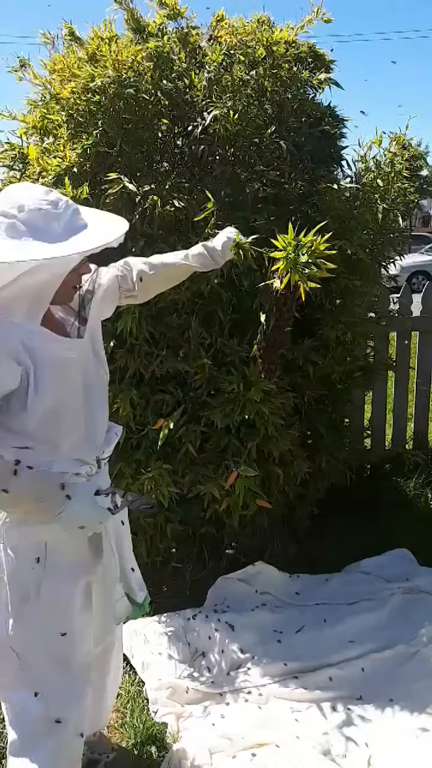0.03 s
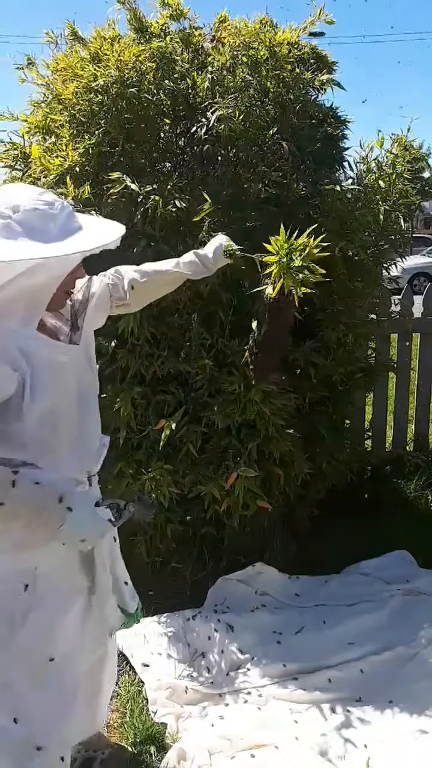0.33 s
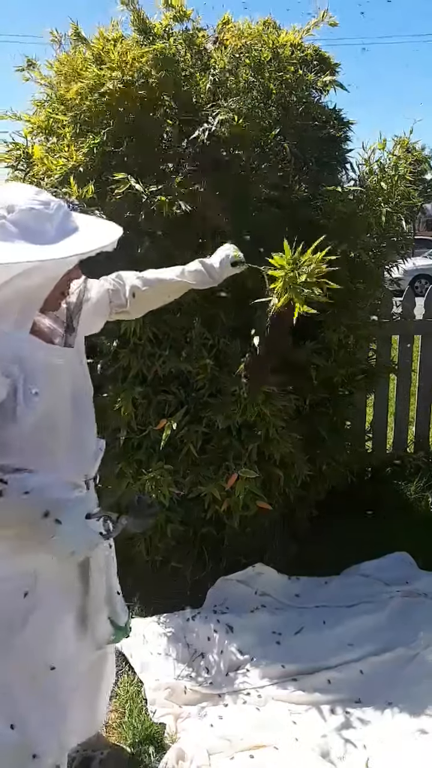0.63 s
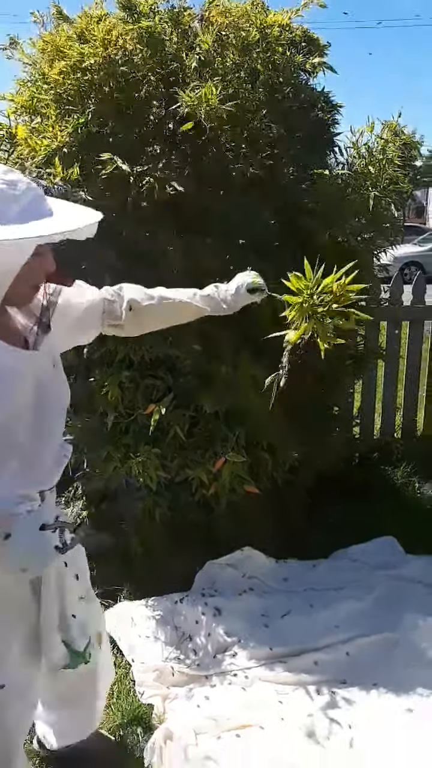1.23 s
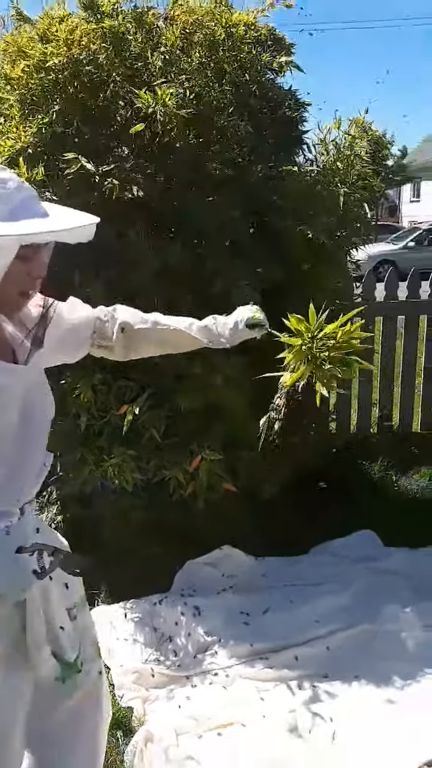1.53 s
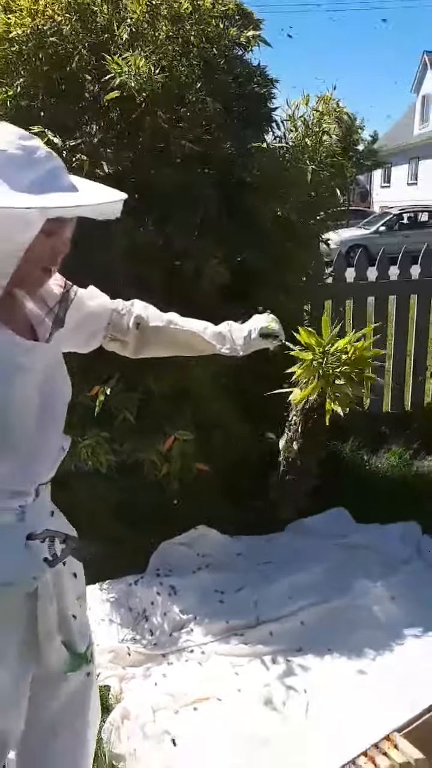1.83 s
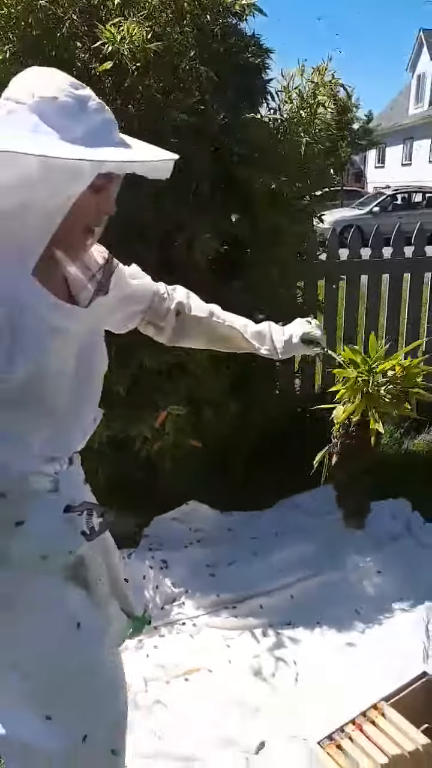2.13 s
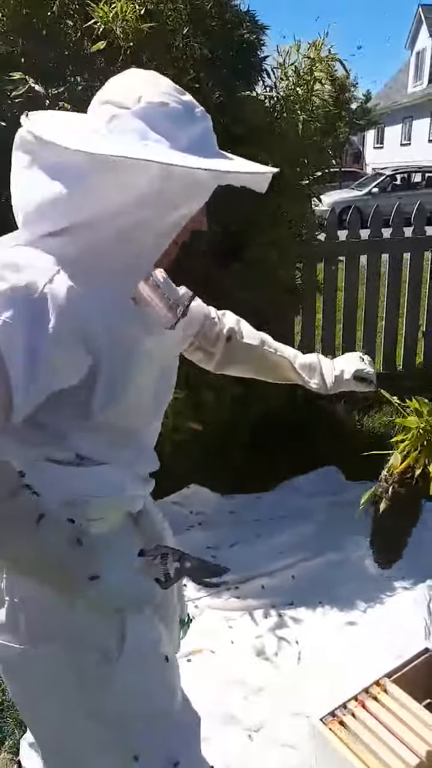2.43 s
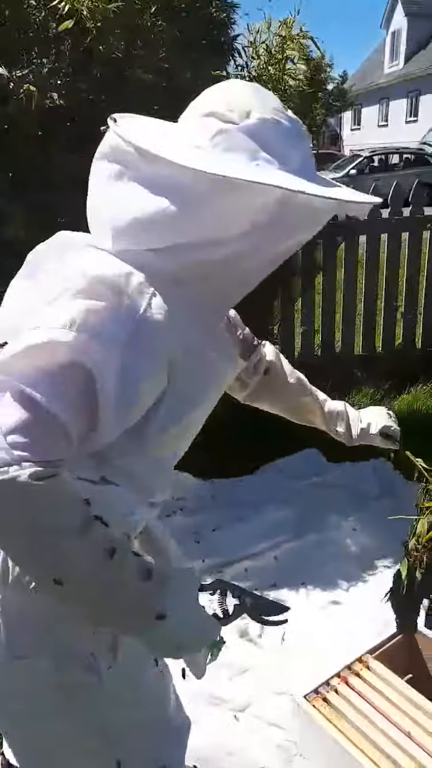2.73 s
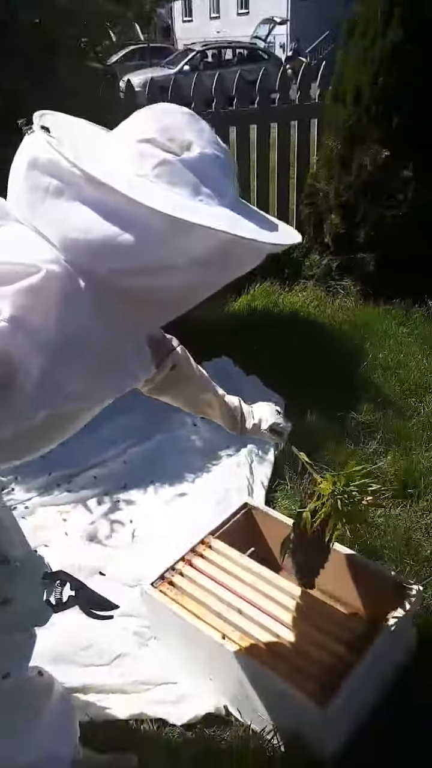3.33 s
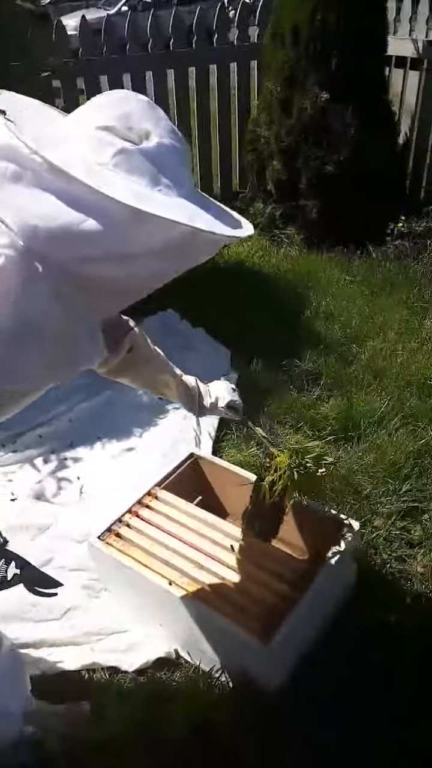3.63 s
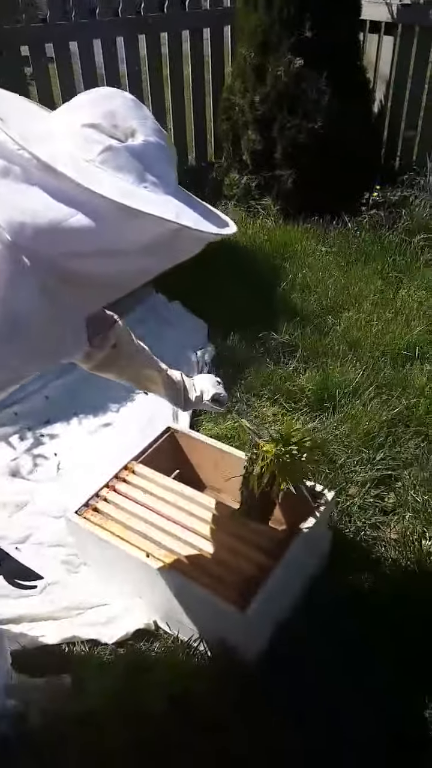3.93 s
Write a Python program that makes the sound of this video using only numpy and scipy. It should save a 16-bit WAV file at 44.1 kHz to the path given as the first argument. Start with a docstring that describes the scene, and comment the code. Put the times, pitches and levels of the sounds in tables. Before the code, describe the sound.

A swarm of bees buzzes throughout over soft outdoor hiss. Wind rumbles and thumps on the microphone, mostly on the right, dying away by 2.7 seconds. Cloth rustles lightly from 0.3 to 0.9 seconds, and a twig snaps amid rustling leaves at about 1.8. A distant bird chirps faintly a few times. From 2.6 seconds the drone is quieter, with single bees passing close and a hum swelling near 4.

```python
"""A yard with a hive box, where honeybees swarm round a beekeeper carrying a leafy sprig.
Dozens of wingbeat pulse trains blur into a drone, and single bees swing close. Turbulent wind
buffets the microphone, mostly its right port, until it turns into shelter. Leaves and the suit
rustle with grainy friction, a twig snaps, and a small bird whistles faintly over the outdoor hiss."""
import sys
import numpy as np
from scipy import signal
from scipy.fft import rfft, irfft
from scipy.io import wavfile

SR = 44100
rng = np.random.default_rng(int(sys.argv[2]) if len(sys.argv) > 2 else 0)


def inscribe(sig):
    """Save sig as 16-bit PCM at rate SR to the path in sys.argv[1].

    A 1-D sig is mono; a 2-D sig holds one channel per row.
    Samples are clipped to [-1, 1] before scaling.
    """
    pcm = np.round(np.clip(np.atleast_2d(sig).T, -1, 1) * 32767)
    wavfile.write(sys.argv[1], SR, pcm.astype(np.int16))


N = 176400
T = np.arange(N) / SR
FREQS = np.fft.rfftfreq(N, 1 / SR)


def amp(db):
    """Decibels to gain."""
    return 10 ** (np.asarray(db) / 20)


def unit(x):
    """Scales to rms 1."""
    return x / np.sqrt(np.mean(x ** 2) + 1e-20)


def level(curve, column=1):
    """A fader ride: gain over time from one dB column of a curve."""
    columns = np.transpose(curve)
    return amp(np.interp(T, columns[0], columns[column]))


def pan(db):
    """Constant-power left and right gains; positive dB leans left."""
    gains = amp([[db / 2], [-db / 2]])
    return gains / np.linalg.norm(gains)


def colour(x, tone):
    """Equalises x with a curve that rolls off below its first point, at rms 1."""
    hz, db = np.transpose(tone)
    gain = amp(np.interp(np.log(FREQS + 1), np.log(hz), db)) * np.minimum(FREQS / hz[0], 1) ** 2
    return unit(irfft(rfft(x) * gain, N))


def drift(per_s, size=N, rate=SR):
    """Smooth random motion of rms 1 that changes up to about per_s times a second."""
    f = np.fft.rfftfreq(size, 1 / rate)
    return unit(irfft(rfft(rng.standard_normal(size)) * np.exp(-(f / per_s) ** 2), size))


def port_noise(likeness, below_hz, delay_s):
    """Noise at the two ports: alike in the lows, where it reaches the left one delay_s later."""
    common, separate = rfft(rng.standard_normal((2, N)))
    same = likeness * np.exp(-(FREQS / below_hz) ** 2)
    left = common * np.exp(-2j * np.pi * FREQS * delay_s)
    right = same * common + np.sqrt(1 - same ** 2) * separate
    return irfft([left, right], N)


def air():
    """A bed of soft outdoor hiss, wide in the treble and narrower in the bass."""
    # The colour of the hiss. Each row: frequency in Hz, relative level in dB.
    tone = [(25, -4), (90, 18.5), (150, 5), (300, 9.5), (700, 11), (1500, 1), (3000, -8.5), (3800, -1.5),
            (7800, 2.5), (8800, -4.5), (10500, -4), (12000, 1.5), (13200, -5)]
    # The bed slowly sinks. Each row: time in seconds, level in dB.
    ride = [(0, -52), (.9, -54), (1.6, -53.5), (2.15, -57.5), (2.45, -55), (2.6, -59), (3.2, -57.5),
            (4, -59.5)]
    return colour(port_noise(likeness=0.73, below_hz=1120, delay_s=0), tone) * level(ride)


def bird():
    """A distant bird: faint warbling whistles that start quickly, glide and fade."""
    # Each row is a note: start in seconds, fade in seconds, pitch in Hz, glide in Hz per second,
    # level in dB, warble depth in Hz.
    chirps = [(.12, 0.067, 3775, 15, -51.5, 25.4), (1.28, 0.06, 5060, -7000, -49.5, 451),
              (1.975, .05, 5400, 4, -51, 499), (2.749, 0.065, 4590, -1500, -56, 550)]
    rise_s = 0.0054
    out = np.zeros(N)
    for start, fade, hz, glide, db, warble_hz in chirps:
        pitch = hz + glide * (T - start) + warble_hz * drift(per_s=750)
        swell = np.exp(-np.logaddexp((start - T) / rise_s, (T - start) / fade))
        out += amp(db) * np.sin(2 * np.pi * np.cumsum(pitch) / SR) * swell
    return out


def wind():
    """Lumpy turbulence, separate at each port; each eddy is a peak of pressure between two dips."""
    # Gusts, then shelter. Each row: time in seconds, left level in dB, right level in dB.
    gusts = [(0, -54.5, -36), (.35, -53.5, -40.5), (.5, -51.5, -38.5), (.78, -48.5, -39), (1.1, -45.5, -36),
             (1.3, -54, -37), (1.56, -58, -43), (1.78, -44.5, -32), (1.95, -55, -39.5), (2.05, -46, -31.5),
             (2.22, -51, -31.5), (2.27, -46.5, -44), (2.54, -57, -41.5), (2.67, -47, -47), (2.76, -78, -62),
             (3, -89, -78)]
    # The colour of the rumble. Each row: frequency in Hz, relative level in dB.
    tone = [(25, -23.5), (40, -13.5), (70, -2.5), (115, 1.5), (170, -3.5), (290, -11), (380, -19.5),
            (600, -31.5), (1500, -46), (5000, -78)]
    # Eddies thump the right port. Each row: time in seconds, level in dB, pitch in Hz.
    eddies = [(0.025, -25.5, 164), (0.099, -21, 136), (.114, -24.5, 193), (.465, -27, 161),
              (0.474, -27, 195), (0.504, -23.5, 178), (0.523, -23.5, 182), (.582, -24, 140),
              (0.6, -20, 156), (.688, -26, 166), (0.701, -21.5, 116), (0.834, -23, 176), (.943, -19, 150),
              (.957, -18.5, 180), (.963, -19.5, 243), (.991, -21, 166), (1.012, -18, 142),
              (1.204, -26, 175), (1.228, -22, 149), (1.264, -21, 146), (1.32, -18, 148),
              (1.375, -24.5, 155), (1.714, -16, 140), (1.765, -20, 162), (1.817, -27, 142),
              (1.862, -17, 144), (1.894, -21.5, 217), (1.901, -23.5, 164), (1.996, -20, 178),
              (2.025, -19, 189), (2.074, -26.5, 148), (2.109, -24.5, 263), (2.122, -28, 177),
              (2.152, -15.5, 168), (2.207, -27, 167)]
    lump_db, eddy_width_cycles = 5, 0.39
    lumps = amp(lump_db * np.tanh([drift(per_s=94) for _ in range(2)]))
    rumble = colour(rng.standard_normal((2, N)) * lumps, tone)
    out = rumble * [level(gusts, column=1), level(gusts, column=2)]
    for peak_s, db, hz in eddies:
        near = abs(T - peak_s) < .03
        cycles = (T[near] - peak_s) * hz
        swing = np.cos(2 * np.pi * cycles)
        bell = np.exp(-.5 * (cycles / eddy_width_cycles) ** 2)
        out[:, near] += amp(db) * pan(db=-34.5) * (swing - np.average(swing, weights=bell)) * bell
    return out


def rustle(strokes, tone):
    """Crinkly friction with sparse ticks, swelling and fading with each stroke."""
    crinkle_db, tick_db, ticks_per_s = 1, 20, 300
    crinkle = amp(crinkle_db * drift(per_s=98))
    ticks = amp(tick_db) * rng.uniform(-1.09, 1, (2, N)) * (rng.random(N) < ticks_per_s / SR)
    friction = port_noise(likeness=1, below_hz=2300, delay_s=0.000328) * crinkle
    power = sum((amp(db) * pan(pan_db)) ** 2 * np.exp(-((T - peak_s) / width) ** 2)
                for peak_s, width, db, pan_db in strokes)
    return colour(friction + ticks, tone) * np.sqrt(power)


def leaves():
    """The sprig's leaves brush with a bright rustle on the right."""
    # Each row is a brush: peak time in seconds, width in seconds, level in dB, left over right in dB.
    brushes = [(.1, 0.013, -37.5, -7), (1.42, 0.074, -51, -20), (1.524, 0.0072, -46, -14),
               (1.853, 0.018, -32, -6), (1.89, 0.099, -49, -4.5), (2.41, 0.025, -51, -6)]
    # The colour of the leaves. Each row: frequency in Hz, relative level in dB.
    tone = [(500, 19.5), (1200, -20), (1900, 11), (2600, 4), (3600, 1), (4300, 12), (5400, 7.5),
            (6100, 15.5), (7000, 4.5), (8000, 11), (9200, -3), (12000, 3.5), (13200, -23)]
    return rustle(brushes, tone)


def suit():
    """Cloth rubs on cloth: short midrange scuffs of the suit, and longer, airier slides of a sleeve."""
    # Each row is a stroke: peak time in seconds, width in seconds, level in dB, left over right in dB.
    scuffs = [(.33, 0.023, -41, -3.5), (.408, 0.023, -41, -4.5), (.455, 0.018, -45.5, -4),
              (1.382, 0.01, -42, -1.5), (1.84, 0.026, -39.5, -0.5)]
    slides = [(.56, 0.038, -45, -1), (.67, 0.082, -43, -1), (.85, 0.089, -54, -1)]
    # The colour of each kind of stroke. Each row: frequency in Hz, relative level in dB.
    scuff_tone = [(350, -31), (700, 4), (1200, 3), (1700, -9), (2300, -3), (3300, -10.5), (5000, -5),
                  (7800, -11), (9000, -20), (13000, -18.5)]
    slide_tone = [(500, -27), (2200, 6.5), (3300, 0.5), (5500, 1.5), (7800, 5.5), (9000, -1), (11000, 1.5),
                  (12600, 9.5), (13300, -6.5)]
    return rustle(scuffs, scuff_tone) + rustle(slides, slide_tone)


def twig():
    """A twig cracks: bright bursts of noise that die within milliseconds."""
    # Each row is a crack: start in seconds, level in dB, decay in seconds.
    snaps = [(1.381, -38, 0.0027), (1.68, -33.5, .0042), (1.832, -26.5, 0.0054), (1.8398, -30, .009)]
    # The colour of the cracks. Each row: frequency in Hz, relative level in dB.
    tone = [(1500, 4), (6500, 14.5), (9500, 6.5), (13000, -5)]
    envelope = sum(amp(db) * (T > start) * np.exp(-abs(T - start) / decay) for start, db, decay in snaps)
    return pan(db=-6) * envelope * colour(rng.standard_normal((2, N)), tone)


def bees(tone, wing_hz, spread, count):
    """Each bee sends one pulse per wingbeat; its pitch, distance and bearing wander as it circles."""
    # The microphone turns past the swarm. Each row: time in seconds, bearing in radians to the right.
    swarm_bearing = [(2.3, 0.94), (3.1, -1.28)]
    pitch_wander, nearness_db, port_delay_s = .03, 3.5, 0.00039
    scatter_rad, wander_rad = 0.6, 0.38
    t = np.linspace(0, N / SR, num=400)
    steps, rate = len(t), 1 / t[1]
    centre = np.interp(t, *np.transpose(swarm_bearing))
    pulses = np.zeros((2, N + 2))
    for detune in np.linspace(-spread, spread, count):
        hz = wing_hz * (1 + detune + pitch_wander * drift(7, steps, rate))
        cycles = np.cumsum(hz) / rate + rng.random()
        beats = np.interp(np.arange(np.ceil(cycles[0]), cycles[-1]), cycles, t)
        nearness = unit(amp(nearness_db * drift(3.15, steps, rate)))
        strength = np.interp(beats, t, nearness)
        bearing = centre + scatter_rad * rng.standard_normal() + wander_rad * drift(1, steps, rate)
        lag = port_delay_s / 2 * np.sin(np.interp(beats, t, bearing))
        for side, arrival in zip(pulses, (beats + lag, beats - lag)):
            at = np.clip(arrival * SR, 0, N)
            whole = at.astype(int)
            side[whole] += strength * (1 - at % 1)  # each pulse straddles two samples
            side[whole + 1] += strength * (at % 1)
    pulses = pulses[:, :N]
    return colour(pulses - pulses.mean(1, keepdims=True), tone)


def hovering_bees():
    """Bees hover by the hive on slower wingbeats: a lower hum that comes forward late."""
    # The hum swells, dips and swells again. Each row: time in seconds, level in dB.
    ride = [(0, -64), (2.3, -55.5), (2.85, -63), (3.05, -59.5), (3.4, -58.5), (3.65, -59), (4, -54)]
    # The colour of the hum. Each row: frequency in Hz, relative level in dB.
    tone = [(230, -43), (330, 12), (400, 2.5), (530, 2), (610, -6), (760, -2.5), (900, -9), (1250, 0),
            (1500, -20), (1820, -4.5), (2500, -40)]
    hum = bees(tone, wing_hz=235.9, spread=.16, count=20) * level(ride)
    return np.sqrt(2) * hum * pan(db=0.3)


def flying_bees():
    """Fast fliers fill the yard with a drone, its lows to the left and its upper overtones to the right."""
    # The drone holds, then drops back. Each row: time in seconds, level in dB.
    ride = [(0, -50.5), (1.1, -52.5), (1.6, -51), (2.48, -55), (2.65, -66), (2.9, -66.5), (3.1, -64.5),
            (3.6, -65.5), (4, -65)]
    # The colour of the drone. Each row: frequency in Hz, relative level in dB.
    tone = [(150, -12), (260, -2.5), (520, 2), (760, -2.5), (1150, -4), (1550, -6), (2200, -7), (3100, -16),
            (5000, -16), (9000, -67)]
    # Its stereo lean. Each row: frequency in Hz, left over right in dB.
    balance = [(500, 3.5), (1100, -1.5), (2200, -6), (5000, -6.5)]
    drone = bees(tone, wing_hz=254.16, spread=.075, count=42) * level(ride)
    lean_db = np.interp(FREQS, *np.transpose(balance)) / 2
    return irfft(rfft(drone) * amp([lean_db, -lean_db]), N)


def passing_bees():
    """Single bees swing close: each buzz swells out of the swarm and sags in pitch as it leaves."""
    # Each row is a fly-by: closest moment in seconds, wingbeat in Hz, level in dB.
    passes = [(.75, 259, -51), (2.69, 247, -57.5), (3.05, 263.7, -57), (3.73, 256, -62), (3.89, 254, -58)]
    half_width_s, pitch_sag, fall_db_per_octave = 0.049, 0.0101, 16
    harmonics = np.arange(1, 9)[:, None]
    weights = amp(-fall_db_per_octave * abs(np.log2(harmonics / 2)))  # the second is strongest
    out = np.zeros(N)
    for closest_s, wing_hz, db in passes:
        near = abs(T - closest_s) < .4
        travel = (T[near] - closest_s) / half_width_s
        cycles = np.cumsum(wing_hz * (1 - pitch_sag * np.tanh(travel))) / SR + rng.random()
        buzz = (weights * np.sin(2 * np.pi * harmonics * cycles)).sum(0)
        out[near] += amp(db) / (1 + travel ** 2) * buzz
    return out


def scene():
    """The swarm, mixed with air, wind, the beekeeper's movements and the bird."""
    movements = leaves() + suit() + twig()
    swarm = flying_bees() + hovering_bees() + passing_bees()
    return swarm + air() + wind() + movements + bird()


def record(dry):
    """The recorder's steep low-pass takes off the very top."""
    cutoff_hz = 13200
    lowpass = signal.firwin(511, cutoff_hz, window=("kaiser", 9), fs=SR)
    return signal.oaconvolve(dry, lowpass[None], "same")


dry = scene()
out = record(dry)
inscribe(out)
```